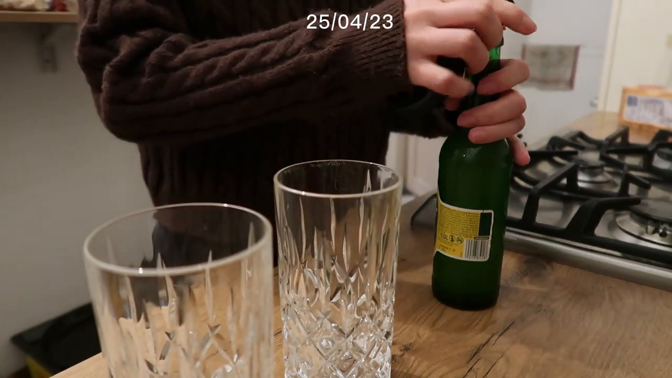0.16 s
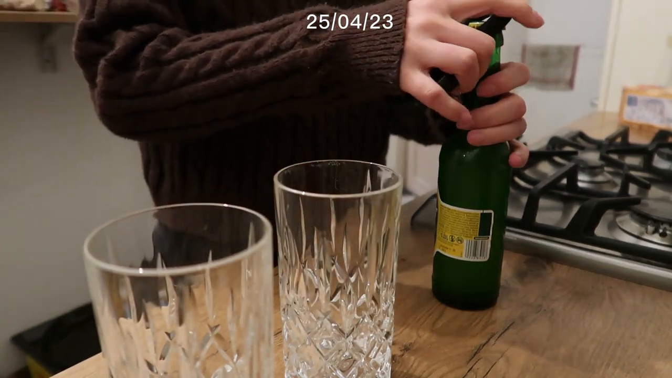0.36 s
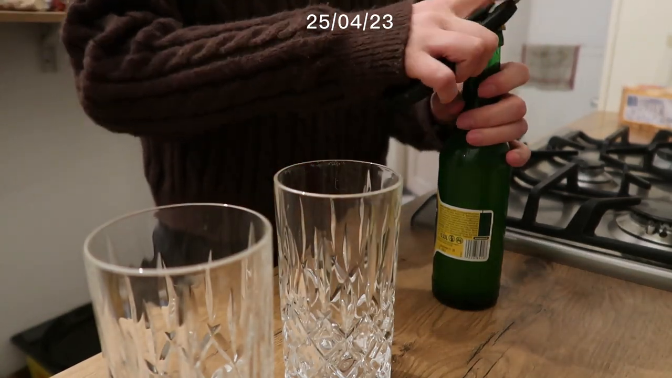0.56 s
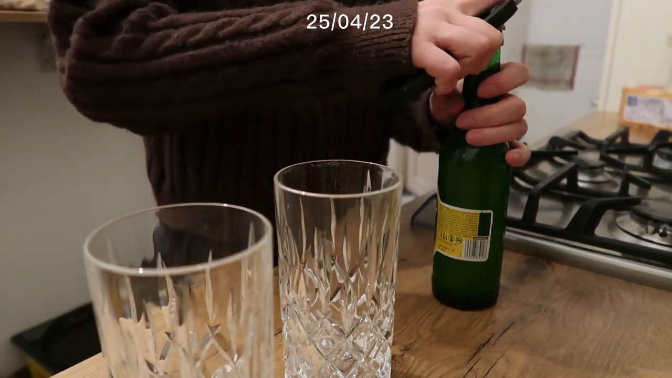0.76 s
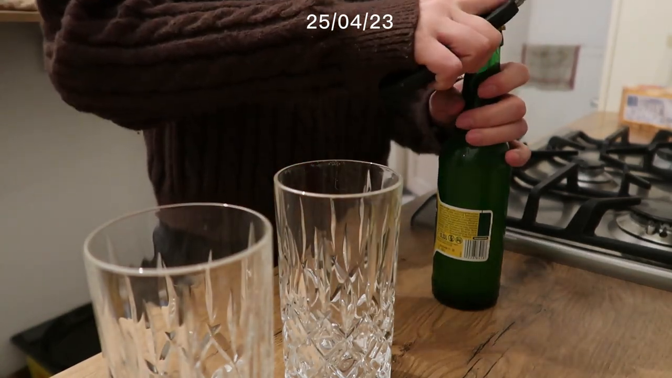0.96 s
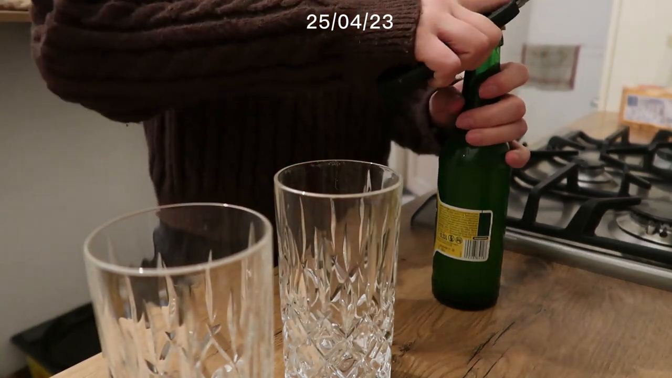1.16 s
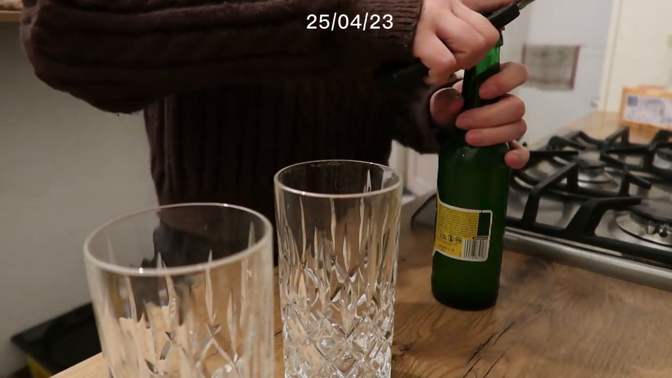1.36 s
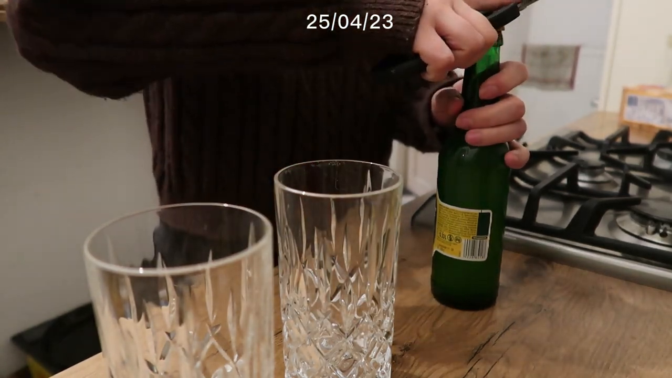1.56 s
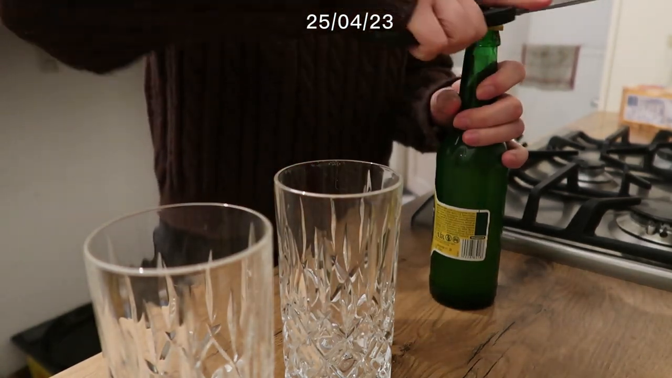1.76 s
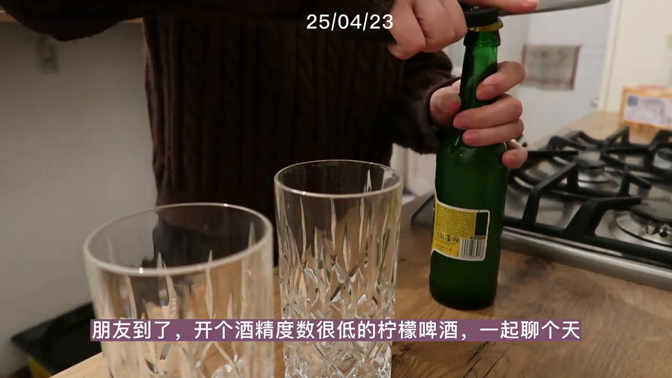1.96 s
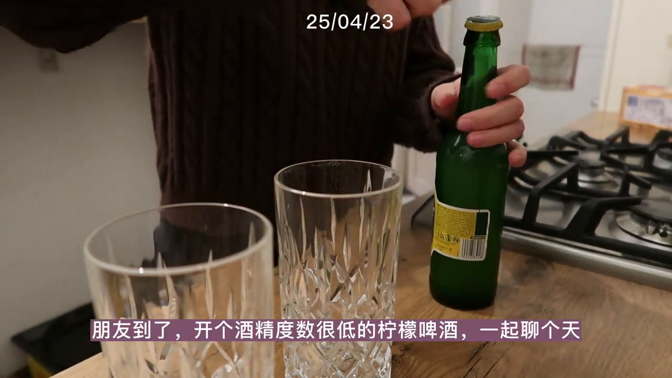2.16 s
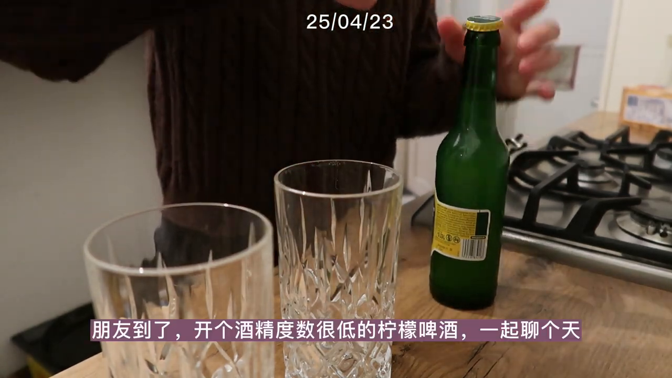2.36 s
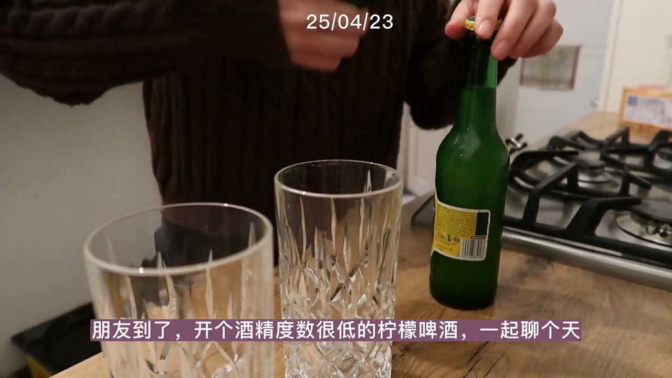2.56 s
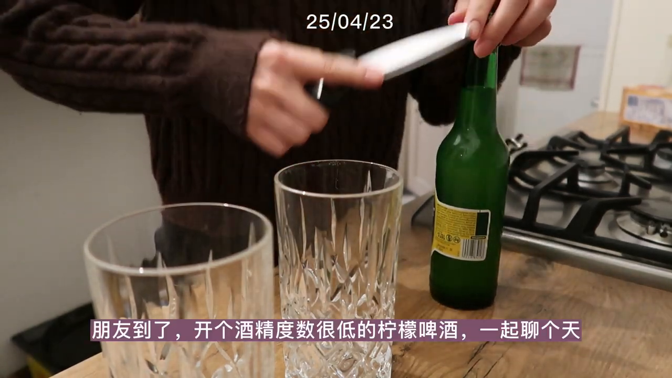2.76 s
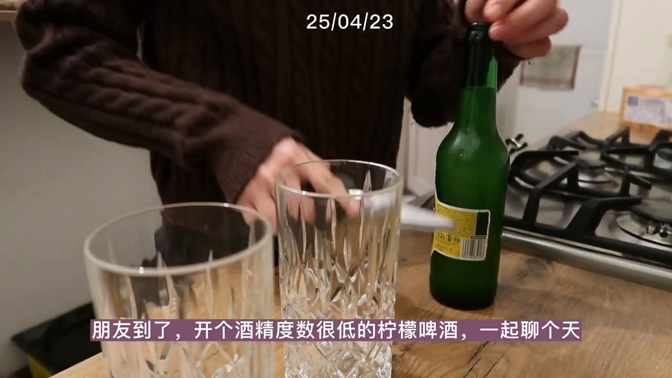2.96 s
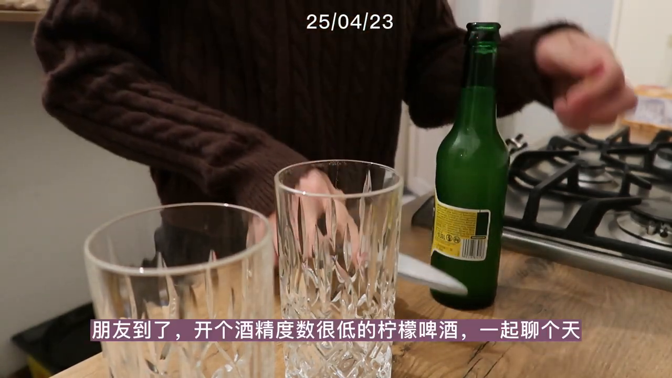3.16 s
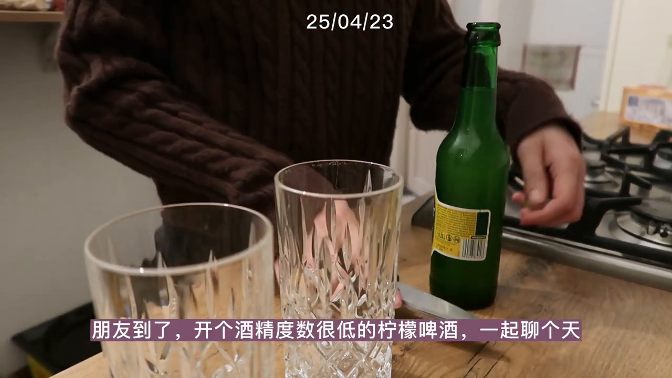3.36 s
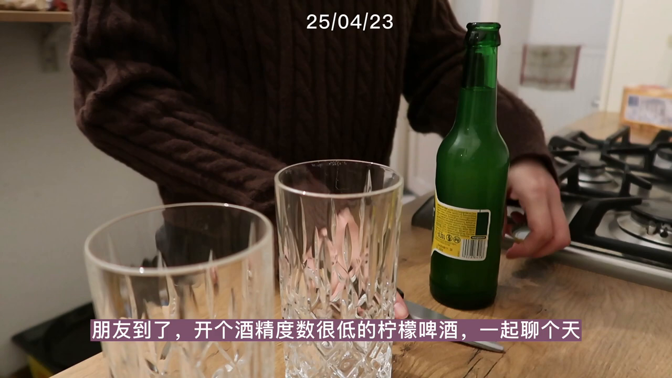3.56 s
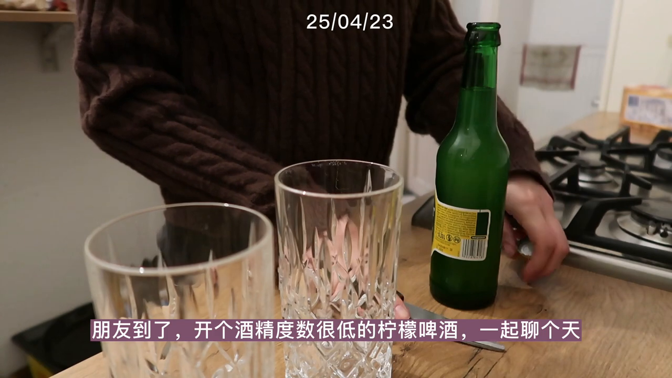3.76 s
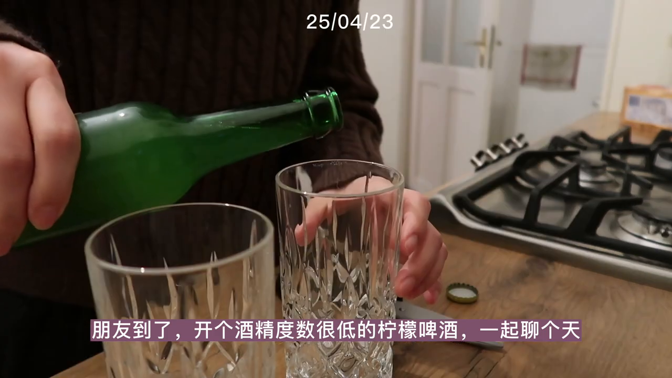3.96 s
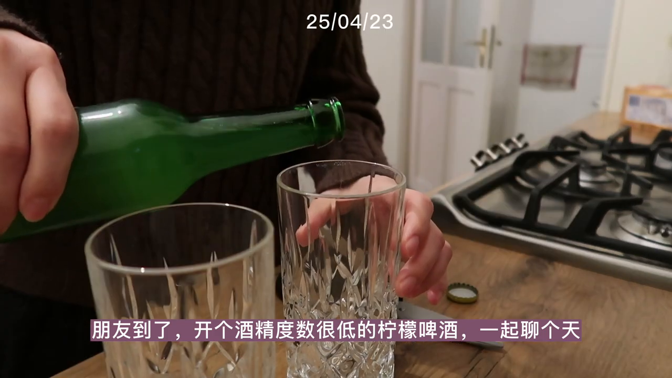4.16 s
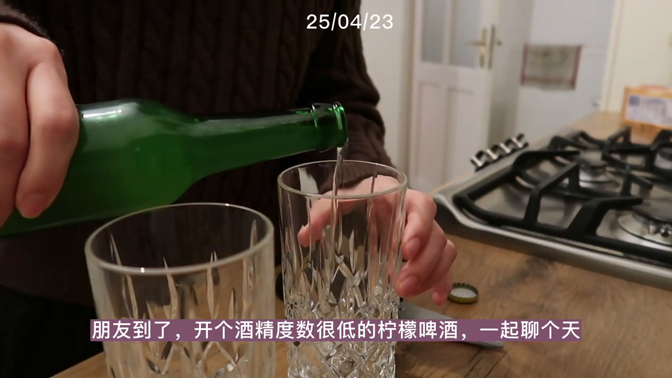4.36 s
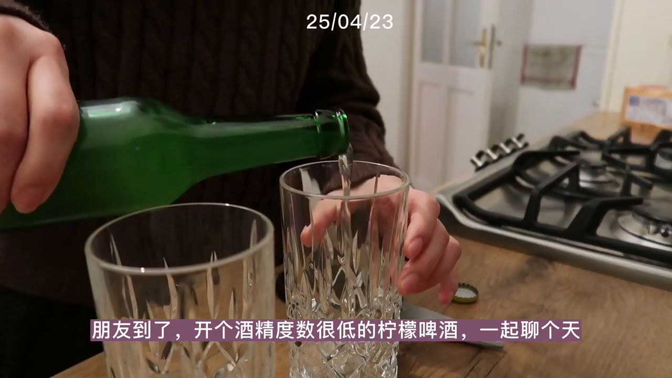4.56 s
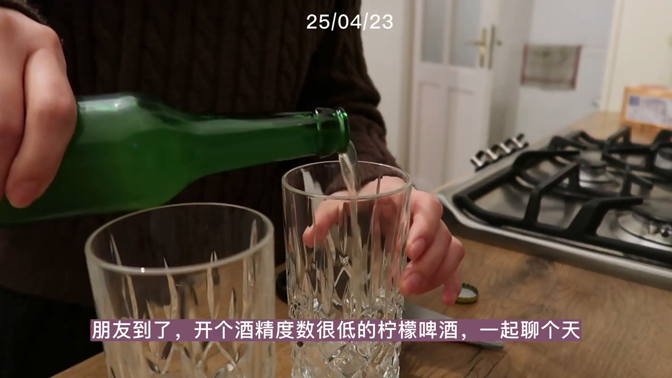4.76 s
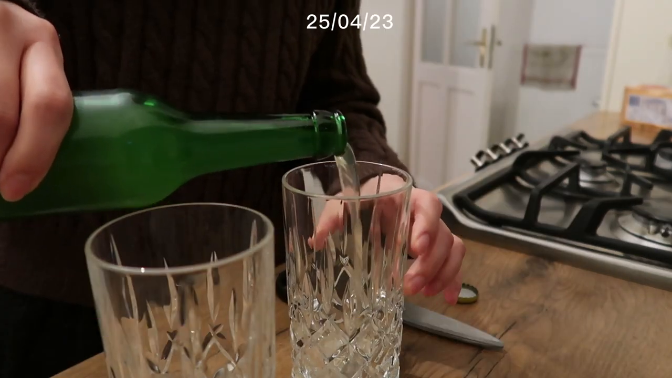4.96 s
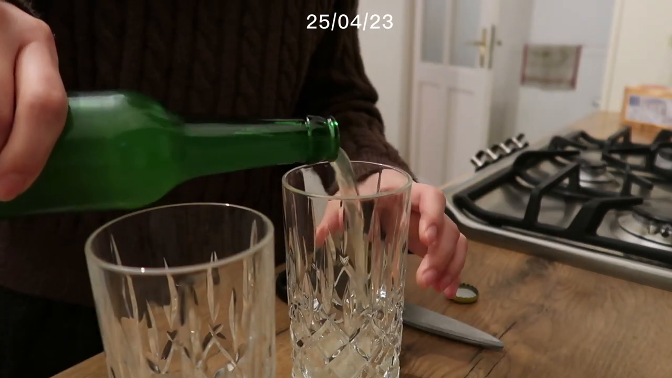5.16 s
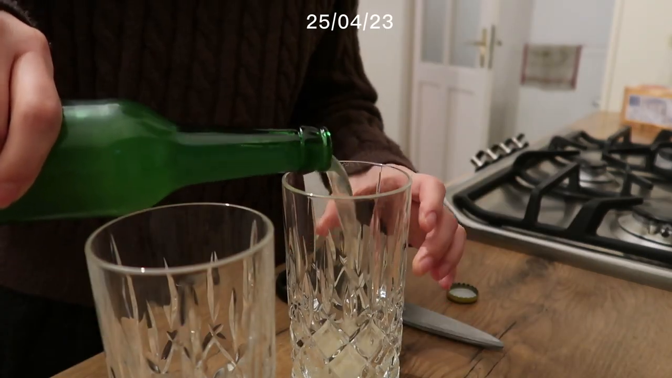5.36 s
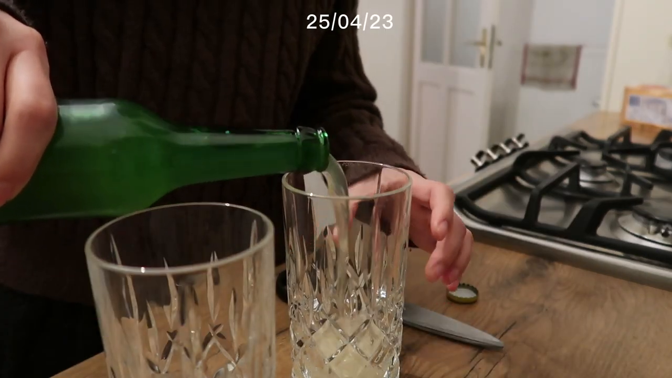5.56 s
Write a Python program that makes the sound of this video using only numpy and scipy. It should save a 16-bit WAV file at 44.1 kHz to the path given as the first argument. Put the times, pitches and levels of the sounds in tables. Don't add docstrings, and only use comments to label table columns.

```python
import sys
import numpy as np
from scipy import signal
from scipy.fft import rfft, irfft, next_fast_len
from scipy.io import wavfile
from scipy.ndimage import uniform_filter1d

SR = 44100
rng = np.random.default_rng(int(sys.argv[2]) if len(sys.argv) > 2 else 0)


def gain_from_db(level_db):
    decades = np.asarray(level_db, float) / 20
    return 10 ** decades


def file_out(sig):
    cols = np.atleast_2d(sig).T
    lim = np.clip(cols, -1, 1)
    pcm = np.round(lim * 32767).astype(np.int16)
    wavfile.write(sys.argv[1], SR, pcm)


N = 248283
T = np.arange(N) / SR
SIZE = next_fast_len(N + SR)
FREQ = np.maximum(np.arange(SIZE // 2 + 1) * SR / SIZE, 1)

# frequency in Hz, level in dB, t60 in seconds.
WOOD_MODES = [(70, -3, 0.3), (113, 4, 0.3), (138.8, 0, 0.18), (173.8, 2, 0.14), (226, 2, 0.16),
              (260, -7, 0.14), (292, 0, 0.115), (374, -9.5, .1), (425, -11, 0.087), (500, -3, 0.14),
              (560, -3, 0.06), (660, 0, 0.1), (745, 1.5, .12)]
# start in seconds, peak in dB, wall mode in Hz, upper mode in Hz, upper level in dB.
WALL_SLAPS = [
    (4.1663, -35, 1260, 2984, -12),
    (4.397, -35, 1360, 3185, -13.5),
    (4.6377, -28, 1475, 3460, -26.5),
    (4.8763, -25, 1558, 3640, -21),
    (5.112, -24.5, 1610, 3690, -20.5),
    (5.352, -30, 1640, 4080, -18),
]
# offset in widths, level in dB.
RING_KNOT = [(-1, -3), (0.3, 0), (1.4, -4), (-2.3, -8)]
KNOT_WIDTH = 0.006
SINGLE_NOTE_DB = 22.5


def unit(x):
    return x / np.sqrt(np.mean(x ** 2))


def on_log(table, hz=FREQ):
    points = np.array(table)
    return np.interp(np.log(hz), np.log(points[:, 0]), points[:, 1])


def coloured(db):
    return irfft(rfft(rng.standard_normal(SIZE)) * gain_from_db(db), SIZE)[:N]


def band(x, lo_hz, hi_hz):
    sos = signal.butter(2, [lo_hz, min(hi_hz, 0.45 * SR)], "band", fs=SR, output="sos")
    return signal.sosfilt(sos, x)


def walk(rate_hz):
    k = int(SR / rate_hz)
    steps = np.repeat(rng.standard_normal(N // k + 1), k)
    return unit(uniform_filter1d(steps, k)[:N])


def gain(s, db):
    return gain_from_db(np.interp(T, s, db, -120, -120))


def gesture(s, length, attack_s, hold_share, release_db):
    at = s + np.array([0, attack_s, attack_s + hold_share * length, attack_s + length, attack_s + 2 * length])
    return gain(at, [-30, 0, 0, release_db, 2 * release_db])


def add(track, s, sound, db):
    i = max(int(s * SR), 0)
    track[i:i + len(sound)] += (sound * gain_from_db(db) / np.abs(sound).max())[:N - i]


def ring(modes, spread_db, near_hz=0, contact_ms=0.05, split=0.038, slope_db=3.0):
    hz, db, t60 = np.repeat(modes, 2, axis=0).T[:, :, None]
    t = T[:int(SR * min(t60.max(), 0.4))]
    weight, detune, start = rng.standard_normal((3,) + hz.shape)
    db = db + spread_db * weight - slope_db * np.abs(np.log2(hz / (near_hz or hz)))
    wave = np.sin(2 * np.pi * hz * (1 + split * detune) * t + 0.5 * start)
    tone = gain_from_db(db) * wave * np.exp(-np.log(1000) * t / t60)
    contact = np.hanning(3 + int(contact_ms * SR / 1000))
    return signal.fftconvolve(tone.sum(axis=0), contact)


def burst(t60, lo_hz, hi_hz):
    n = SR // 4
    x = band(rng.standard_normal(n), lo_hz, hi_hz) * 1000. ** (-T[:n] / max(t60, 0.003))
    return x / np.abs(x).max()


def blip(hz, hold_s, t60, glide, rise_s=0.0005):
    t = T[:int(SR * (hold_s + t60)) + 9]
    shape = np.minimum(t / rise_s, 1) * 1000. ** (-np.maximum(t - hold_s, 0) / t60)
    return shape * np.sin(2 * np.pi * hz * (t + glide * t ** 2 / 2))


def knot(hz, hold_s, t60, glide, rise_s):
    return sum(gain_from_db(db) * blip(hz * (1 + KNOT_WIDTH * offset), hold_s, t60, glide, rise_s)
               for offset, db in RING_KNOT)


def grainy(lo_hz, hi_hz, depth_db, rate_hz):
    noise = band(band(rng.standard_normal(N), lo_hz, hi_hz), 0.7 * lo_hz, 1.8 * hi_hz)
    return unit(noise * gain_from_db(min(depth_db, 4.5) * np.clip(walk(rate_hz), -2, 2)))


def opener():
    # frequency in Hz, level in dB, t60 in seconds.
    steel_modes = [(1520, 10, 0.022), (2000, -6, 0.031), (2335, -3, 0.022), (2740, -2, .12),
                   (2880, -10, 0.2), (3057, 9, 0.035), (3380, -2, 0.09), (4140, -9, 0.035),
                   (4533, -12, 0.08), (5060, -4, 0.13), (6240, -14, .08), (6400, -6, .05), (7235, -4, .25),
                   (7600, -2, .08)]
    # start in seconds, peak in dB, favoured pitch in Hz, scrape in dB.
    ticks = [
        (1.39, -31, 2300, 1),
        (1.8044, -5, 2900, -12),
        (1.812, -6.5, 2560, -4),
        (1.8135, -8, 1500, -50),
        (1.849, -20, 1800, -26),
        (1.861, 0, 3270, -2.5),
        (1.938, -5, 5000, -8),
        (1.949, -13, 4460, 15.5),
        (1.986, -6, 2900, -33),
        (2.005, -6, 3000, -2.5),
    ]
    # start in seconds, peak in dB, frequency in Hz, t60 in seconds.
    neck_modes = [(1.830, -21, 750, .25), (1.861, -24, 9400, .04), (1.862, -21, 10600, .05),
                  (1.863, -21, 12500, .035), (1.938, -20, 5050, .35), (1.939, -21, 9150, .03),
                  (1.948, -18, 13200, .025), (1.949, -13, 9160, .04), (1.952, -12, 845, .45),
                  (1.985, -14, 2920, .03), (1.986, -19, 4150, .03), (1.950, -22, 7235, .35),
                  (2.004, -27, 3420, .2), (2.005, -14, 3000, .025), (1.862, -19, 7960, .07),
                  (1.939, -19, 7300, .12), (1.939, -20, 6850, .05), (1.812, -22, 6400, .06)]
    # start in seconds, length in seconds, level in dB, hiss in dB.
    slips = [
        (1.796, 0.061, -11, -40),
        (1.834, 0.052, -33, -60),
        (1.835, 0.13, -20, -35),
        (1.932, 0.05, -15.5, -19),
        (1.977, 0.043, -23, -70),
    ]
    out = np.zeros(N)
    grind, hiss = grainy(670, 2620, 5.3, 210), grainy(11000, 13000, 3.7, 200)
    grind = grind + gain_from_db(-13) * grainy(3200, 7300, 5.0, 150.1)
    for s, db, near_hz, scrape_db in ticks:
        add(out, s, ring(steel_modes, 2.5, near_hz, split=0.003, slope_db=9.0), db)
        add(out, s, burst(0.036, 570, 5900), db + scrape_db)
    for s, db, hz, t60 in neck_modes:
        add(out, s, ring([(hz, 0, t60)], 0.99, split=0.004), db)
    for s, length, grind_db, hiss_db in slips:
        slip = gesture(s, length, attack_s=0.0066, hold_share=0.21, release_db=-29)
        out += (grind * gain_from_db(grind_db) + hiss * gain_from_db(hiss_db)) * slip
    return out


def chimes():
    # start in seconds, t60 in seconds, frequency in Hz, peak in dB.
    steel_rings = [(1.812, 0.042, 3060, -28.5), (1.863, 0.29, 3381, -35), (1.864, 0.47, 2860, -38.5),
                   (1.864, 0.16, 5030, -48), (1.938, 0.055, 5000, -34), (1.94, 0.43, 4700, -45),
                   (1.988, 0.43, 2900, -40.5), (1.988, 0.027, 4150, -36.5), (2.005, 0.27, 3420, -39.5),
                   (1.949, 0.042, 9160, -32.5), (2.003, 0.039, 11750, -32.5), (1.98, 0.039, 13000, -47),
                   (2.712, 0.04, 2940, -50), (2.712, 0.2, 3000, -56), (2.708, 0.15, 4900, -58),
                   (2.5, .08, 2700, -58), (2.748, 0.055, 12000, -62), (1.863, .06, 10550, -39.5),
                   (1.863, .03, 9400, -38.5)]
    out = np.zeros(N)
    for s, t60, hz, db in steel_rings:
        add(out, s, knot(hz, 0, t60, 0, rise_s=0.002), db + SINGLE_NOTE_DB + 3.5)
    return out


def counter_blows():
    # start in seconds, peak in dB, contact time in ms, favoured pitch in Hz.
    blows = [(0.004, -11, 1.43, 172), (0.432, -17, 1.9, 305), (0.677, -29, 3, 113), (0.703, -23, 7.2, 113),
             (0.731, -26, 8, 113), (1.034, -28, 4.3, 70), (1.804, 3, 1.38, 392), (1.811, -8, 1.1, 380),
             (1.823, 3, 0.45, 292), (1.830, 1, 0.38, 206), (1.845, -1.5, 0.51, 153), (1.858, -9, 1.6, 220),
             (1.875, -11, 1.2, 220), (1.951, -5.5, 0.27, 159), (1.985, -11.5, 0.41, 227),
             (2.262, -30.5, 3.6, 150), (2.299, -39, 5.9, 66), (2.354, -34, 5.4, 70),
             (2.949, -16, 0.76, 142), (3.675, -30, 1.5, 200)]
    out = np.zeros(N)
    for s, db, contact_ms, near_hz in blows:
        add(out, s, ring(WOOD_MODES, 3.8, near_hz, contact_ms, 0.03, 5.3), db + 12)
    return out


def counter_notes():
    # start in seconds, t60 in seconds, frequency in Hz, peak in dB.
    touched_modes = [(0.0, 0.28, 185.6, -27), (0.002, 0.32, 141, -32), (.294, 0.069, 125, -39),
                     (0.002, 0.17, 507, -40.5), (.267, .15, 146, -38.5), (.33, 0.16, 236, -50),
                     (.345, 0.27, 470, -46.5), (.30, 0.24, 668, -49), (.428, 0.24, 557, -48.5),
                     (.47, 0.13, 300, -45), (.66, 0.36, 113, -43), (1.8031, .05, 2770, -31),
                     (1.815, 0.35, 68, -29), (1.812, 0.15, 125, -26), (2.949, .03, 328, -43),
                     (1.803, 0.017, 4250, -34), (1.812, 0.015, 2560, -21), (1.812, 0.017, 1420, -22.5),
                     (1.823, 0.057, 615, -17.5), (1.823, .015, 2140, -25), (1.8295, 0.058, 202, -14.5),
                     (1.843, .03, 3100, -25.5), (1.853, .015, 1660, -31), (1.854, 0.053, 622, -24),
                     (1.861, 0.041, 765, -21.5), (1.861, 0.032, 2857, -24), (1.862, 0.019, 5100, -34),
                     (1.862, 0.013, 4250, -33), (1.872, 0.26, 173.3, -23), (1.904, 0.057, 756, -32.5),
                     (1.943, 0.03, 2800, -28.5), (1.948, 0.044, 752, -23), (1.949, 0.012, 4320, -32),
                     (1.957, 0.29, 226, -26), (1.986, 0.02, 2890, -23), (2.0026, 0.016, 3000, -29),
                     (2.033, 0.086, 805, -32.5), (2.30, 0.63, 70.4, -47.5), (2.951, 0.018, 770, -52),
                     (3.676, 0.028, 200, -38), (3.684, 0.027, 1580, -51), (3.704, 0.038, 698, -15),
                     (3.713, 0.063, 689, -17.5), (3.703, 0.019, 3440, -34), (3.728, 0.03, 4230, -36.5),
                     (3.734, 0.11, 160, -31), (3.738, 0.034, 1420, -31), (3.74, 0.22, 754.3, -29),
                     (3.742, 0.19, 880, -31.5), (3.79, 0.089, 146, -29.5), (3.795, .04, 1510, -36),
                     (3.84, .12, 150, -38), (3.865, 0.037, 700, -41.5)]
    out = np.zeros(N)
    for s, t60, hz, db in touched_modes:
        rise_s = 1.1 / hz + 0.0007
        add(out, s, blip(hz, 0, t60, 0, rise_s), db + SINGLE_NOTE_DB)
    return out


def knife():
    # frequency in Hz, level in dB, t60 in seconds.
    handle_modes = [(131, 11.5, 0.18), (666.7, 5, 0.17), (765, -13, 0.13), (1305, 7, 0.14),
                    (1420, -18, 0.1), (1860, -33, 0.041), (2318, 14, 0.043), (2880, -1, 0.04),
                    (3460, -8, 0.029), (4250, -34, .05)]
    # frequency in Hz, level in dB, t60 in seconds.
    blade_modes = [(137, -5, 0.32), (165, 14.5, 0.061), (225, -3, 0.14), (740, -17, 0.79), (933, -10, 0.11),
                   (1028, 2.5, 0.047), (1214, 3, 0.051), (1334, -13, 0.38), (1610, -13, 0.07),
                   (1906, -2, 0.068), (2010, 9.5, 0.024), (2100, 3.5, 0.025), (3000, -14, 0.03),
                   (4440, -23, 0.027)]
    # start in seconds, peak in dB, crack in dB, favoured pitch in Hz.
    contacts = [
        (3.7006, -4, 4.5, 690),
        (3.7265, 6, -2, 1760),
        (3.7356, -7.5, -19, 300),
        (3.753, -16, -14, 800),
        (3.794, -17.5, 4.5, 800),
    ]
    out = np.zeros(N)
    for (s, db, crack_db, near_hz), body in zip(contacts, [handle_modes] + 4 * [blade_modes]):
        add(out, s, ring(body, 3.7, near_hz, 0.12, 0.013, 3.24), db + 12)
        add(out, s, burst(0.034, 960, 2600), db + crack_db)
        add(out, s, burst(0.043, 3000, 6600), db + crack_db - 16)
    return out


def hands():
    # low edge in Hz, high edge in Hz.
    rustle_bands = [(400, 1800), (1500, 3600)]
    # start in seconds, length in seconds, pressure on the counter in dB,
    # sleeve rustle in dB, skin rustle in dB.
    moves = [(0, 0.21, -25, -41.5, -43), (0.145, 0.19, -30, -52, -54), (0.262, 0.3, -30, -27.5, -31),
             (0.407, 0.39, -38, -49, -69), (0.66, 0.11, -34, -46, -53), (0.804, 0.12, -42.5, -53, -71),
             (1.01, 0.071, -41, -71, -74), (1.379, 0.071, -50, -39, -37), (2.249, 0.53, -47.5, -47, -49),
             (2.691, 0.41, -62, -41.5, -46), (2.844, 0.34, -65, -37, -41), (2.953, 0.11, -29, -38.5, -63),
             (2.996, 0.24, -65, -36.5, -49), (3.261, 0.33, -54, -45, -48), (3.462, 0.32, -58, -48, -45.5),
             (3.655, 0.084, -56, -54, -36)]
    hold_share, release_db = 0.27, -33
    out = np.zeros(N)
    pressure = rng.standard_normal(N) * gain_from_db(1.1 * walk(28))
    drum = unit(signal.fftconvolve(pressure, ring(WOOD_MODES, 0, 225, 1.89, 0.008, 7.4))[:N])
    sleeve, skin = (grainy(lo_hz, hi_hz, 7.1, 70) for lo_hz, hi_hz in rustle_bands)
    squeak_hz = 1274
    skin = skin + gain_from_db(10.5) * band(skin, 0.92 * squeak_hz, 1.043 * squeak_hz)
    for s, length, press_db, sleeve_db, skin_db in moves:
        press = gesture(s, length, 0.0088, hold_share, release_db)
        brush = gesture(s, length, 0.03, hold_share, release_db)
        out += drum * gain_from_db(press_db + 7.5) * press
        out += (sleeve * gain_from_db(sleeve_db) + skin * gain_from_db(skin_db)) * brush
    return out


def gulps():
    # climb in ms, low pitch in Hz, kick in dB, swell in dB,
    # swell depth in dB.
    air_pockets = [
        (216, 138, -41, -47, 6),
        (212, 94, -45, -43, 5),
        (203, 76, -47, -40, 22),
        (226, 69, -47, -39, 36),
        (256, 72, -58, -42, 40),
        (280, 75, -60, -40, 45),
    ]
    kick_t60, top_t60 = 0.16, 0.09
    pinch_share = 0.93
    out, wobble = np.zeros(N), gain_from_db(2.2 * walk(30))
    for (s, *_), (climb_ms, low_hz, kick_db, swell_db, depth_db) in zip(WALL_SLAPS, air_pockets):
        t, climb = np.maximum(T - s, 0), climb_ms / 1000
        progress = np.minimum(t / climb, 1)
        sharp = 1 + 0.12 * np.exp(-t / 0.02)
        hz = low_hz * sharp / np.sqrt(1 + 1e-6 - progress ** 3.1)
        hz = np.minimum(hz, 2.9 * low_hz)
        size = gain_from_db(kick_db - 60 * t / kick_t60) + gain_from_db(swell_db - depth_db * (1 - progress))
        size = size * gain_from_db(-60 * np.maximum(t - pinch_share * climb, 0) / top_t60)
        out += size * wobble * np.sin(2 * np.pi * np.cumsum(hz * (t > 0)) / SR)
    return out


def bottle():
    # start in seconds, peak in dB, frequency in Hz, t60 in seconds.
    gulp_bursts = [
        (4.365, -39, 386, 0.14),
        (4.402, -40, 378, 0.075),
        (4.44, -52.5, 316, 0.3),
        (4.612, -42, 302, 0.087),
        (4.639, -42, 292, 0.15),
        (4.872, -39.5, 186, 0.049),
        (5.108, -48.5, 169, 0.053),
        (5.351, -34.5, 156, 0.022),
    ]
    out = np.zeros(N)
    for s, db, hz, t60 in gulp_bursts:
        add(out, s, ring([(hz, 0, t60)], 2.3, contact_ms=2.5, split=0.012), db)
    for s, db, hz, upper_hz, upper_db in WALL_SLAPS:
        add(out, s, blip(hz, 0.0055, 0.011, 1.4), db - 0.5)
        add(out, s, knot(hz, 0.01, 0.63, 0.049, 0.0124), db - 28)
        add(out, s, blip(upper_hz, 0.0006, 0.016, 0.61), db + upper_db + 9.5)
        add(out, s, blip(upper_hz, 0.005, 0.16, 0, 0.008), db + upper_db - 14)
        add(out, s, blip(1.585 * upper_hz, 0.001, 0.018, 0), db + upper_db - 7)
        add(out, s, blip(568, 0.0017, 0.038, 0), db - 19.5)
        add(out, s, burst(0.006, 300, 3500), db - 16)
    return out


def drops_and_jets():
    # start in seconds, peak in dB, frequency in Hz, length in cycles.
    drops = [(5.003, -27.5, 2900, 12), (5.015, -37.5, 2690, 64), (5.05, -40, 2180, 16),
             (5.075, -37.5, 1870, 19), (5.147, -30, 4430, 17), (5.174, -35, 2308, 3),
             (5.189, -27.5, 1660, 18), (5.21, -34.5, 3650, 18), (5.237, -36.5, 1197, 23),
             (5.25, -29, 1486, 16), (5.282, -25.5, 1500, 4), (5.299, -38, 1840, 13),
             (5.401, -27.5, 1700, 4), (5.46, -25.5, 1690, 5.6), (5.493, -24, 1770, 5.9),
             (5.517, -32, 2890, 17), (5.54, -29.5, 1860, 9.4), (5.596, -35.5, 647, 12.4),
             (5.611, -34, 1810, 12)]
    # start in seconds, peak in dB, t60 in seconds, centre in Hz.
    jets = [(4.726, -53, 0.036, 7940), (4.7515, -59, 0.036, 11100), (4.874, -57, 0.054, 7000),
            (4.885, -50, 0.083, 11500), (4.906, -41.5, 0.076, 8800), (4.976, -50, 0.05, 12000),
            (5.015, -42.5, 0.065, 6760), (5.159, -42.5, 0.16, 9500), (5.3511, -46.5, 0.097, 5900),
            (5.444, -50, 0.08, 10000), (5.465, -49, 0.059, 7960)]
    # start in seconds, peak in dB, frequency in Hz, t60 in seconds, climb per second.
    bubbles = [(5.115, -44, 3960, 0.055, 6), (5.13, -44.5, 3360, 0.055, 0.5), (5.147, -41, 3000, .02, 9),
               (5.173, -38, 3300, 0.035, 9), (5.172, -38.5, 2760, 0.037, 6), (5.174, -37, 2100, 0.023, 4),
               (5.223, -40, 1260, 0.042, -2), (5.232, -41.5, 2240, 0.023, 1), (5.282, -44, 3650, .025, 4),
               (5.284, -40, 1040, 0.044, 4.5), (5.30, -46, 2980, .02, 1), (5.331, -48, 2930, 0.018, 1),
               (5.33, -44, 1277, 0.071, 1.5), (5.409, -44, 1790, 0.036, 1), (5.455, -42, 986, 0.074, 1.5),
               (5.456, -50, 2100, .03, 4), (5.489, -45, 3000, .015, 4), (5.49, -40.5, 950, 0.037, 1),
               (5.497, -36, 1820, 0.058, 2.5), (5.52, -41, 1200, 0.037, 0), (5.531, -29, 1800, 0.0096, 5),
               (5.55, -38, 1900, 0.027, 4), (5.597, -45, 2940, 0.024, 4), (5.025, -45.5, 3630, 0.062, 1.5),
               (4.912, -47.5, 4200, .04, 5), (5.018, -39, 6660, .01, 6), (5.165, -46, 11700, .01, 2),
               (4.755, -56, 12500, .01, 2), (5.46, -51, 12500, .01, 2), (5.19, -41, 2010, .03, 10),
               (5.265, -39, 1610, .025, 2), (5.12, -40, 2230, .02, 5), (5.599, -47, 1060, 0.033, -4),
               (5.612, -43, 3860, .02, 0), (5.62, -41, 716, 0.035, 12)]
    out = np.zeros(N)
    for s, db, hz, cycles in drops:
        add(out, s, blip(hz, 0.15 * cycles / hz, 3.6 * cycles / hz, 5.1, 0.00083), db - 3.5)
        add(out, s, burst(0.079, 1460, 4200), db - 20)
    jet_rise = np.minimum(T[:SR // 4] / 0.0059, 1)
    for s, db, t60, hz in jets:
        add(out, s, burst(t60, 0.62 * hz, 1.23 * hz) * jet_rise, db)
    for s, db, hz, t60, climb in bubbles:
        add(out, s, blip(hz, 0.0012, 1.08 * t60, climb, 0.00075), db - 0.5)
    return out


def stream():
    # time in seconds, level in dB.
    flow = [
        (4.89, -58),
        (4.95, -75),
        (5.06, -63),
        (5.13, -67),
        (5.25, -51),
        (5.34, -54),
        (5.45, -53),
        (5.54, -57),
        (5.63, -50),
    ]
    # frequency in Hz, width in Hz, level in dB.
    glass_modes = [(598, 110, 7), (1145, 190, -5), (1376, 150, 1.5), (1770, 284, 7), (2900, 770, 0),
                   (3610, 660, -2.5)]
    crowd, fizz = np.zeros(N), np.zeros(N)
    s, level_db = np.transpose(flow)
    start, length = s[0], s[-1] - s[0]
    fizz_db = -68.5 - 11 * (s - start)
    for when, pitch, size in rng.random((2200, 3)):
        hz = 620 * 7 ** pitch
        db = 14 * size ** 2 - 10 * abs(pitch - 0.45)
        add(crowd, start + when * length, blip(hz, 4 / hz, 24 / hz, 14, 0.001), db)
    for when, pitch, size in rng.random((900, 3)):
        hz = 4500 * 3 ** pitch
        add(fizz, start + when * length, blip(hz, 0, 30 / hz, 0, 0.001), 10 * size ** 2)
    crowd = crowd + gain_from_db(10) * grainy(700, 4000, 4.8, 90)
    resonances = sum(gain_from_db(db) * band(crowd, hz - w / 2, hz + w / 2) for hz, w, db in glass_modes)
    crowd = (gain_from_db(-7) * crowd + resonances) * gain_from_db(1.8 * walk(40))
    fizz = fizz * gain_from_db(5 * walk(18))
    inside = T > start
    out = crowd / np.std(crowd[inside]) * gain(s, level_db + 2)
    out += fizz / np.std(fizz[inside]) * gain(s, fizz_db + 3.5)
    return out + grainy(69, 164, 6.7, 25) * gain(s, np.full(len(s), -58.5))


def ports(x, share):
    # frequency in Hz, turn in radians.
    port_turn = [(1000, 0.11), (3500, 0.27), (5500, 0.47), (7500, 2.28), (10500, 2.83), (15000, 1.6)]
    turn = np.exp(-0.5j * share * on_log(port_turn))
    return irfft(rfft(x, SIZE) * np.array([turn, 1 / turn]), SIZE)[:, :N]


def room(x, wet_db, wide_hz):
    # frequency in Hz, t60 in seconds.
    room_t60 = [(100, 0.43), (500, 0.47), (2000, 0.27), (6000, 0.43), (14000, 0.04)]
    t, tails = T[:SR * 3 // 4], 0
    for hz in 60.8 * 2 ** np.arange(8):
        noise = band(rng.standard_normal((2, len(t))), hz / 1.27, hz * 1.445)
        lean = np.arctan(min((hz / wide_hz) ** 1.5, 2.5))
        mid_side = np.array([[np.cos(lean)], [np.sin(lean)]])
        thin = np.sqrt(min(hz / 900, 1))
        decay = 1000. ** (-t / max(on_log(room_t60, hz), 0.05))
        tails = tails + thin * noise * mid_side * decay
    tails *= np.clip((t - 0.003) / 0.0013, 0, 1) * gain_from_db(wet_db) / np.sqrt(np.sum(tails[0] ** 2))
    mid, side = signal.fftconvolve(x[None], tails, axes=1)[:, :N]
    return np.array([mid + side, mid - side])


def hum():
    # frequency in Hz, level in dB per Hz.
    hum_spectrum = [(15, -22), (25, -12), (48, -4), (66, -0.5), (122, -1.5), (178, -5.5), (322, -7),
                    (349, -11), (389, -7.5), (537, -13.5), (1080, -16), (4620, -27.5), (12800, -41.5),
                    (15500, -54)]
    # frequency in Hz, side minus mid in dB.
    side_over_mid = [(60, -35), (110, -10), (200, -3.5), (380, 0), (700, -1), (1290, -2), (2380, -2),
                     (4400, -1), (8120, -0.5), (15000, 3)]
    db = on_log(hum_spectrum)
    mid, side = coloured(db), coloured(db + on_log(side_over_mid))
    level = gain_from_db(-58.5 + 0.5 * walk(3.19))
    return np.array([mid + side, mid - side]) * level / np.std(mid)


def scene():
    # time in seconds, level in dB.
    counter_fade = [
        (3.80, -26),
        (3.85, -26.5),
        (3.885, -37.5),
        (3.90, -51),
    ]
    counter = hands() + counter_blows() + knife() + opener()
    for _ in range(3):
        counter = band(counter, 60, 19000)
    notes = counter_notes() + chimes()
    pouring = bottle() + drops_and_jets() + stream()
    fade = gain_from_db(np.interp(T, *np.transpose(counter_fade)))
    before = ports(counter + notes, 0.79) + room(counter + gain_from_db(-5) * notes, -6.5, 4800)
    after = ports(pouring, 0.83) + room(pouring, -10, 6900)
    return before * fade + after + gulps() + hum()


def low_pass(x):
    return signal.sosfilt(signal.butter(12, 15600, fs=SR, output="sos"), x)


def record(dry):
    return low_pass(dry)


dry = scene()
out = record(dry)
file_out(out)
```